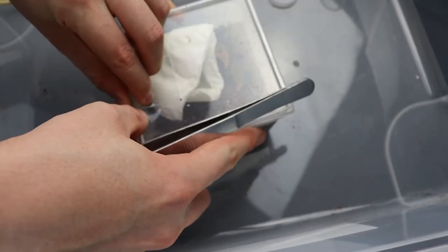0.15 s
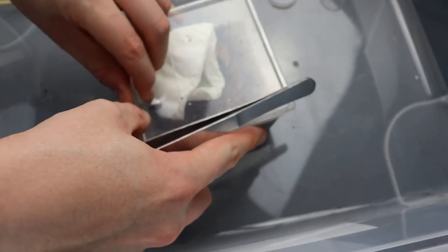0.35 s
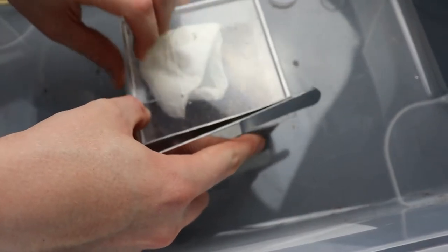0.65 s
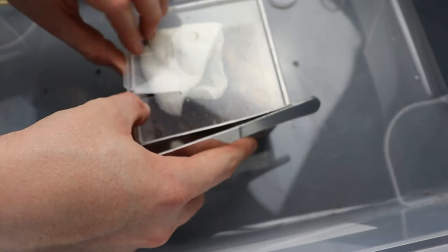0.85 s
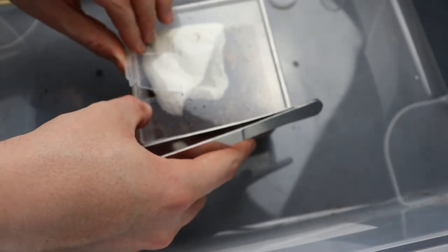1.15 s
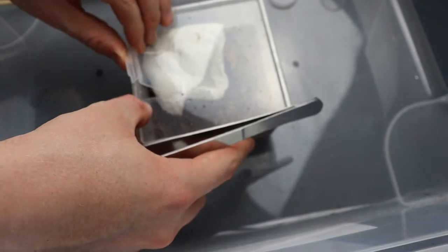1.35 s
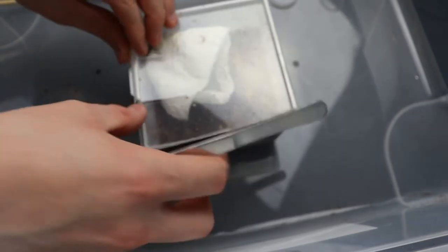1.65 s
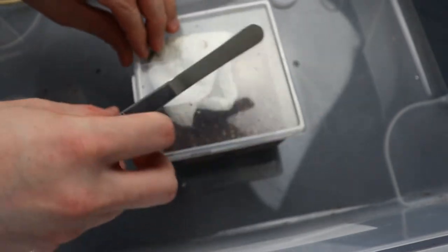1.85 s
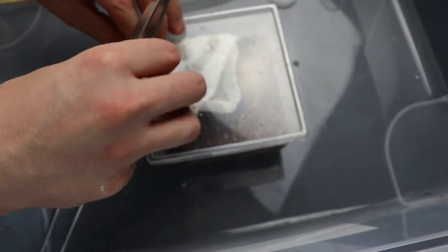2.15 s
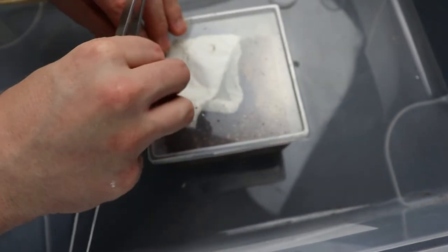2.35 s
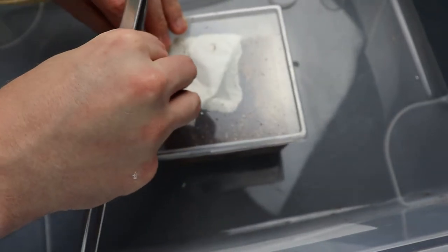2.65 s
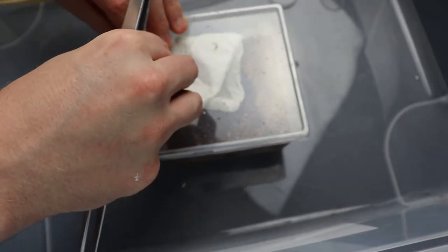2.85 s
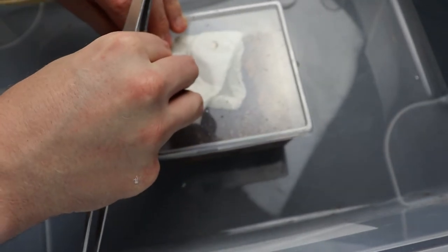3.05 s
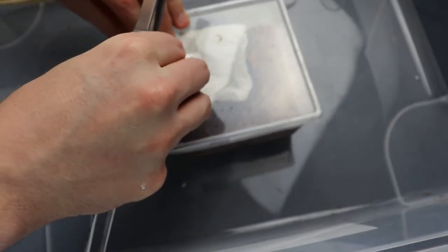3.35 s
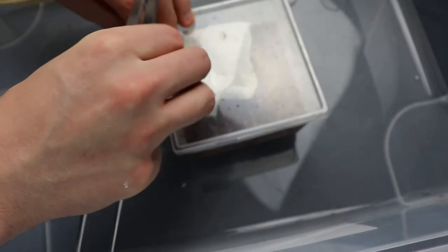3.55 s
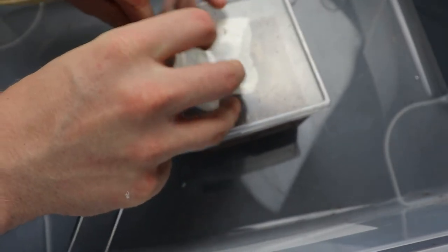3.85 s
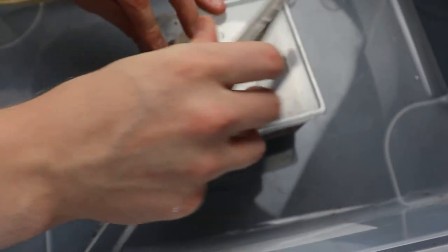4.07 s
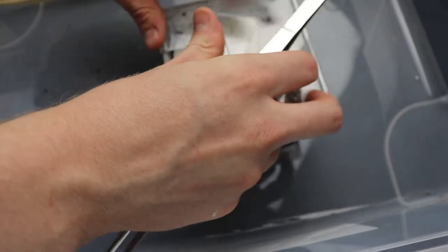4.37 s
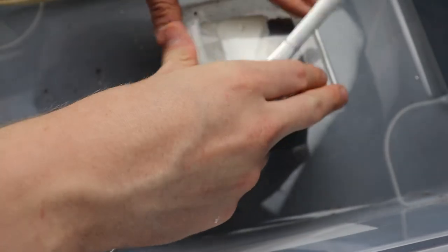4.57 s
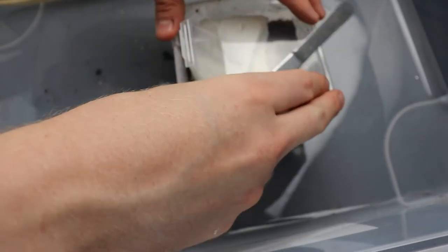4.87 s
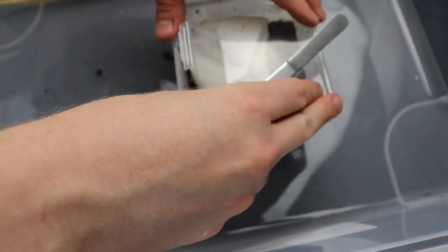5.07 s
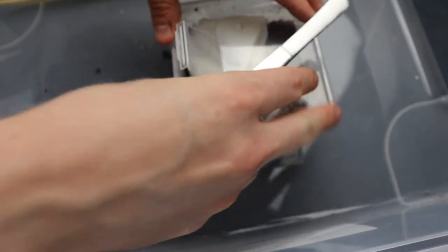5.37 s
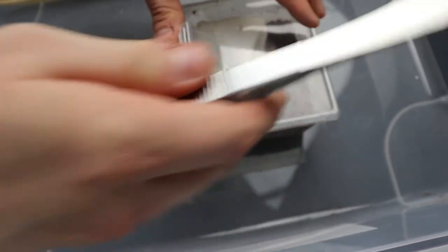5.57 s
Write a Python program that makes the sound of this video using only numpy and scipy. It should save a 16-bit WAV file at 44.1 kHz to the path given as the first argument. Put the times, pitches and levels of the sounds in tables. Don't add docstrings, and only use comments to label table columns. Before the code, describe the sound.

Close stereo microphone in a small room: fingers and steel tweezers handle a small plastic box inside a larger plastic tub. Loud hard snaps come early, with a quick lid scrape, then irregular clicks, knocks and rubbing. A crisp cluster follows in the middle, then mostly quieter shuffling with two late snaps. Appliance hum, hiss and a very faint bird lie beneath.

```python
import sys
import numpy as np
from scipy import signal
from scipy.fft import rfft, irfft, next_fast_len
from scipy.io import wavfile
from scipy.ndimage import uniform_filter1d

SR = 44100
rng = np.random.default_rng(int(sys.argv[2]) if len(sys.argv) > 2 else 0)


def master(y):
    cut = np.clip(np.atleast_2d(y).T, -1, 1)
    pcm = np.round(cut * 32767)
    wavfile.write(sys.argv[1], SR, pcm.astype(np.int16))


def decibels_to_gain(level_db):
    exponent = np.asarray(level_db, float) / 20
    return 10 ** exponent


N = 251811

# f/Hz, level/dB, t60/s
TUB_FLOOR_MODES = [(67, -9, 0.17), (106.7, -7, 0.13), (123.6, 3.5, 0.14), (145.8, 9, 0.048),
                   (171, 1.5, 0.06)]
TUB_SIDE_MODES = [(226.4, -9, 0.046), (276.3, 1, 0.077), (313, -0.5, 0.075), (346.7, 0.5, 0.061),
                  (383.4, 1.5, 0.049), (456, -2, 0.078), (542.6, 1, 0.051), (647, -1.5, 0.068),
                  (708, -1, 0.012)]
BOX_WALL_MODES = [(732, -3, 0.058), (972, 3.5, 0.06), (1116.5, 7, 0.057), (1183.4, 5.5, 0.048),
                  (1289, 10, 0.028), (1479, 8, 0.056), (1717, 10, 0.025), (1875, 8, 0.027),
                  (2000, 3, 0.0065)]
LID_CATCH_MODES = [(2145, -1, 0.0054), (2600, 1.5, 0.0085), (2662, 0, 0.012), (2937, 1, 0.018),
                   (3167, -2.7, 0.03), (3500, 0.4, 0.014), (3958, -2, 0.018), (3985, -5.1, 0.019),
                   (4504, -4, 0.0025)]
# f/Hz, level/dB
EDGE_COLOUR = [(4500, 6.5), (5400, 11.5), (6800, 9.5), (8500, 5.5), (12000, 3.5), (16000, -6.5)]

# t/s, box wall peak level/dB, weight on the tub/dB, hardness/dB; snaps add nearness to the catch/dB
SNAPS = [(0.068, -17.5, -21.5, -33, 3), (0.142, -1.5, -10.5, -15, -2), (0.329, -11, -19, -19, 0.5),
         (0.893, -5, -11, -9, 1), (1.841, -3.5, -12, -23, 0), (1.945, -13, -13.5, -8.5, 3),
         (2.334, -19, -19, -11.5, 4), (2.383, -23.5, -12.5, -16, 3), (2.491, -25.5, -14, -6.5, -2),
         (2.499, -8, -20.5, -7, -5.5), (3.036, -10, -20, -8, 0), (3.261, -10.5, -16, 2, -3),
         (3.284, -40, -14, 11, 1.5), (3.417, -27.5, -15, -15.5, 4), (3.563, -2, -20, -10.5, -10.5),
         (3.579, -10, -22, -11.5, -3), (4.671, -27, -8, -26, 6.5), (4.984, -9.5, -8, -3, -5)]
TICKS = [(0.537, -29.5, -7.5, -12.5), (0.819, -27, -13.5, -22), (0.836, -30, -8.5, -33),
         (1.502, -46, -4, -8), (1.542, -38, -16, -7.5), (1.769, -34, -11.5, -17.5),
         (2.213, -30, -16, -16.5), (2.469, -30, -17, -27), (3.755, -30.5, -7, -9), (3.806, -52.5, -4, 2.5),
         (4.002, -43.5, -13, -35), (4.066, -40.5, -15, -28), (4.127, -43.5, -5.5, -28), (5.393, -55, 0, -7),
         (5.481, -35, -7.5, -8.5), (5.504, -47, -6, -2), (5.583, -45, -8, -18)]
THUDS = [(0.043, -24, 4, -36), (0.562, -29, -17, -27.5), (0.706, -6.5, -14, -15.5), (0.709, -23, -8, -7.5),
         (1.565, -32.5, -4, -16.5), (1.844, -17, -1.5, -23), (1.856, -16.5, -6.5, -47),
         (2.354, -10.5, -7.5, -21), (3.532, -38, 2, -6), (3.63, -35, -4, -19), (3.84, -36.5, -6.5, -22.5),
         (3.892, -37.5, 1.5, -18.5), (4.251, -41.5, -0.5, -25), (4.279, -53, 11.5, -16),
         (4.309, -31.5, -5.5, -34), (4.389, -42, -6.5, -31), (4.575, -25, -2, -35), (4.735, -54, 13, -24),
         (4.838, -41.5, -2.5, -29), (5.312, -27, -4.5, -26), (5.536, -29, -7, -45), (5.607, -31.5, -7, -53),
         (5.685, -30.5, -7.5, -32)]
SHUFFLES = [(0.444, -47.5, -2, -7), (0.641, -37, -8, -19), (1.128, -39.5, -8.5, -29),
            (1.149, -41, -1.5, -19), (3.398, -46.5, -24, -8.5), (3.49, -58, -5, -4), (4.228, -56, -2, -2.5),
            (4.327, -50.5, 6, -7), (4.503, -59.5, 10, -6), (4.548, -45, 1.5, -17),
            (5.423, -44.5, 1.5, -7.5)]
RUSTLES = [(1.073, -47, -5, -17), (1.244, -57, -7, -5.5), (1.643, -56.5, -3, -5), (1.708, -48.5, -8, -12.5),
           (2.165, -54.5, 7, -18), (2.638, -44.5, -7.5, -24), (3.928, -66, -6, -11),
           (4.164, -47, -11, -8.5), (4.613, -47, -4, -13.5)]
# length/ms, first blow, fading, swelling
CHATTER = [
    (2.184, 3.2, 4.4, 0.0013),
    (6.88, 2.06, 2.04, 0.072),
    (20.09, 0.075, 0.89, 0),
    (54.9, .1, 2.15, 1.06),
]
# tub floor re sides/dB, change/(dB per dB strength),
# lid catch/dB, change/(dB per dB hardness)
REACH = [
    (-23.5, -0.56, -2.5, 0.66),
    (-3.5, 0.06, -4, 0.5),
    (-3.5, 0.2, -1, 0.9),
    (1, 0.1, 2.5, 1.4),
]
SIDE_TILT_DB_PER_OCT = [5.5, 2, 1.5, .5]

# t/s, level/dB, panel f/Hz
SCRAPE = [
    (.662, -69, 2600),
    (0.67, -41.5, 2520),
    (0.686, -38, 2690),
    (0.693, -29.5, 2460),
    (0.708, -29.5, 2860),
]
# t/s, level/dB, start f/Hz, end f/Hz, length/s
CHIRPS = [
    (1.322, -59.5, 5030, 4900, 0.086),
    (1.406, -55.5, 4230, 4160, 0.044),
    (2.088, -61.5, 5250, 4940, .06),
    (2.168, -54, 4200, 4170, 0.044),
]

# t/s, pressure level/dB
PRESSURE = [(0.0, -39), (0.16, -68.5), (0.33, -62), (0.46, -59.5), (0.79, -57.5), (1.19, -62),
            (1.49, -62.5), (1.78, -55.5), (2.11, -64.5), (2.51, -60.5), (2.8, -65), (3.05, -65),
            (3.53, -57), (4.9, -60), (5.15, -66), (5.36, -65), (5.5, -58.5), (5.71, -56)]
RESTING_HAND_DB = -59.5
# level at rest/dB, change/(dB per dB pressure)
WALL_RUB = (-64, 1.27)
TUB_RUB = (-56, 0.76)
SKIN_RUB = (-72, 0.87)

# f/Hz, level/(dB per Hz)
BACKGROUND = [(20, -23), (72, -8), (120, 5.5), (270, -8), (503, -10), (863, -19), (1600, -15.5),
              (16000, -30.5)]
BACKGROUND_DB = -55
# f/Hz, likeness
BACKGROUND_LIKENESS = [(60, 0.5), (240, 0.97), (950, -1.1), (3770, -2.9), (15000, 0.9)]
# f/Hz, likeness
TUB_LIKENESS = [(100, 1), (1000, 0.97), (4000, 0.57), (15000, 0)]
# f/Hz, t60/s
ROOM_T60 = [(100, 0.13), (300, 0.36), (800, 0.23), (2000, 0.16), (5000, 0.15), (13000, 0.12)]
# f/Hz, left minus right level/dB
BALANCE_DB = [(60, -4), (240, -2), (950, -4), (3770, -5), (15000, -6.5)]


def evened(x):
    return x / np.sqrt(np.mean(x ** 2) + 1e-20)


def read(points, hz):
    f, value = np.transpose(points)
    return np.interp(np.log(hz + 1), np.log(f + 1), value)


def add(mix, s, sound):
    part = mix[..., round(s * SR):][..., :sound.shape[-1]]
    part += sound[..., :part.shape[-1]]


def paired(size, likeness, frame):
    hz = np.fft.rfftfreq(frame, 1 / SR)
    a, b, c, d = rng.standard_normal((size, len(hz), 4)).T
    same = np.clip(read(likeness, hz), 0, 1)[:, None]
    left, other = a + 1j * b, c + 1j * d
    return hz, np.array([left, same * left + np.sqrt(1 - same ** 2) * other])


def hum_and_hiss():
    hz, z = paired(N // 256 + 5, BACKGROUND_LIKENESS, frame=1024)
    z = z * decibels_to_gain(read(BACKGROUND, hz))[:, None]
    noise = signal.istft(z, nperseg=1024, noverlap=768)[1][:, :N]
    return decibels_to_gain(BACKGROUND_DB) * evened(noise) * decibels_to_gain([[-1.5], [1.5]])


def ring(hz, db, t60, size, rise_s=0.000069):
    t = np.arange(size) / SR
    modes = decibels_to_gain(-60 * t / t60[:, None]) * np.sin(2 * np.pi * hz[:, None] * t)
    return decibels_to_gain(db) @ modes * (1 - np.exp(-t / rise_s))


def rub():
    press_db = np.interp(np.arange(N) / SR, *np.transpose(PRESSURE)) - RESTING_HAND_DB
    wall_db, tub_db, hiss_db = (db + follows * press_db for db, follows in (WALL_RUB, TUB_RUB, SKIN_RUB))
    clumps = decibels_to_gain(4.0 * evened(uniform_filter1d(rng.standard_normal(N), 900)))
    strength = decibels_to_gain(3.2 * np.minimum(rng.exponential(1, (3, N)), 5))
    slips_per_s = 1500 * clumps
    slips = strength * (rng.random((3, N)) < slips_per_s / SR)
    slips *= rng.standard_normal((3, N))
    wall = signal.lfilter(*signal.butter(1, [450, 2200], "band", fs=SR), slips[0])
    hz, db, t60 = np.transpose(TUB_FLOOR_MODES + TUB_SIDE_MODES)
    tub = signal.oaconvolve(slips[1], ring(hz, db, .5 * t60, size=5000))[:N]
    breath = slips[2] + 1.5 * rng.standard_normal(N)
    hiss = signal.lfilter(*signal.butter(2, 4500, "high", fs=SR), breath)
    return decibels_to_gain(wall_db) * evened(wall) + decibels_to_gain(tub_db) * evened(tub) + decibels_to_gain(hiss_db) * evened(hiss)


def shares(reach, db, weight_db, hard_db, near_db=0):
    floor_db, per_strength, catch_db, per_hardness = reach
    tub_db = weight_db + floor_db + per_strength * db
    return tub_db, weight_db, catch_db + per_hardness * hard_db + near_db, hard_db


def spread(hz, level_db, size=2048):
    f = np.fft.rfftfreq(size, 1 / SR) + 1
    gain = decibels_to_gain(np.interp(f, hz, level_db))
    gain = gain / (1 + (.9 * hz[0] / f) ** 6) / (1 + (f / hz[-1] / 1.1) ** 6)
    cepstrum = irfft(np.log(gain + 1e-4 * gain.max()))[:size // 2]
    causal = np.r_[1, np.full(size // 2 - 1, 2)]
    return irfft(np.exp(rfft(cepstrum * causal, size)))


def chatter(contact, gaps, blows):
    length_ms, first, fading, swelling = contact
    when = np.r_[0, gaps]
    force = np.r_[first, 2 * blows - 1] * np.exp(-fading * when) * (when + 0.018) ** swelling
    return np.bincount((when * length_ms * SR / 1000).astype(int), force)


def hit(s, db, tub_db, sides_db, catch_db, edge_db, contact, tilt_db, luck):
    gaps, blows, detune, uneven, facing = luck.reshape(5, -1)
    push = chatter(contact, gaps, blows)
    swells = contact[3] > 0
    edge_hz = np.linspace(4550, 15600, len(gaps))
    edge_t60 = .003 + .006 * detune ** 3
    side_hz, side_db, side_t60 = np.transpose(TUB_SIDE_MODES)
    side_db = side_db + tilt_db * np.log2(side_hz / side_hz[0])
    # f/Hz, level/dB, t60/s, share/dB, rise/s
    bodies = [(*np.transpose(TUB_FLOOR_MODES), tub_db + 2.5, .018),
              (side_hz, side_db, side_t60, sides_db + 3.5, .001),
              (*np.transpose(BOX_WALL_MODES), -.7, .00015),
              (*np.transpose(LID_CATCH_MODES), catch_db + 14.5, .0001),
              (edge_hz, read(EDGE_COLOUR, edge_hz), edge_t60, edge_db + 16, .00008)]
    out = np.zeros((3, 11000))
    for hz, level_db, t60, share_db, rise_s in bodies:
        size, count = int(min(t60.max(), .15) * SR), len(hz)
        no_bass = signal.butter(2, 0.51 * hz[0], "high", fs=SR)
        even = signal.fftconvolve(spread(hz, level_db), push if swells else [1.])
        hz = hz * (1 + 0.089 * (detune[:count] - .5))
        drive = abs(signal.freqz(push, worN=hz, fs=SR)[1]) + .05 * np.linalg.norm(push)
        caught_db = .7 * 20 * np.log10(drive)
        facing_db = 6 * (facing[:count] - .5) * np.minimum(hz / 1500, 1)
        mode_db = level_db - caught_db + 11 * uneven[:count] + np.outer([-1, 1], facing_db)
        near = ring(hz, mode_db, t60, size, rise_s)
        near = signal.lfilter(*no_bass, signal.fftconvolve(near, push[None], axes=1))
        near *= decibels_to_gain(db + share_db) / abs(near).max()
        out[:2, :near.shape[1]] += near
        out[2, :len(even)] += even * np.linalg.norm(near[0]) / np.linalg.norm(even)
    return s + .0008, out


def echoes(x, likeness, t60_of, start, size, late_db=-90, slower=2.4):
    hz, z = paired(size, likeness, frame=256)
    t = np.arange(size) * 64 / SR
    t60 = t60_of(hz)[:, None]
    decay = decibels_to_gain(-60 * t / t60) + decibels_to_gain(late_db - 60 * t / slower / t60)
    tail = signal.istft(z * decay, nperseg=256, noverlap=192)[1]
    tail = np.pad(tail / np.linalg.norm(tail[0]), ((0, 0), (start, 0)))
    return signal.oaconvolve(x[None], tail, axes=1)[:, :N]


def tub_scatter(x):
    return decibels_to_gain(-2.5) * echoes(x, TUB_LIKENESS, lambda hz: 0.018 + 0 * hz, start=40, size=60)


def room_answer(x):
    likeness = [(100, 1.0), (400, 0.94), (1000, 0.43), (5000, 0.48)]  # f/Hz, likeness
    return decibels_to_gain(-11.0) * echoes(x, likeness, lambda hz: read(ROOM_T60, hz), start=250, size=350, late_db=-21)


def scrape():
    s, db, hz = np.transpose(SCRAPE)
    t = np.arange(s[0], s[-1], 1 / SR)
    noise = rng.standard_normal(len(t))
    turn = np.exp(2j * np.pi * np.cumsum(np.interp(t, s, hz)) / SR)
    r = np.exp(-np.pi * 900 / SR)
    panel = (turn * signal.lfilter([1 - r], [1, -r], noise / turn)).real
    fizz = 0.22 * noise
    return s[0], decibels_to_gain(np.interp(t, s, db)) * (evened(panel) + fizz) * signal.windows.tukey(len(t), .15)


def chirp(s, db, start_hz, end_hz, length_s):
    hz = np.linspace(start_hz, end_hz, round(length_s * SR))
    blur_hz = 30 + 0.26 * (start_hz - 4200)
    blur = evened(uniform_filter1d(rng.standard_normal(len(hz)), 120)) * blur_hz
    return s, decibels_to_gain(db) * np.sin(2 * np.pi * np.cumsum(hz + blur) / SR) * np.hanning(len(hz))


def ports(x, late_samples=2.35):
    size = next_fast_len(N)
    hz = np.fft.rfftfreq(size, 1 / SR)
    half = decibels_to_gain(read(BALANCE_DB, hz) / 2)
    delay = np.exp(-2j * np.pi * hz * late_samples / SR)
    low_cut = (1 + 35 / (1j * hz + 1e-9)) ** 2
    high_cut = 1 + (hz / 15900) ** 40
    gain = np.array([half, delay / half]) / low_cut / high_cut
    return irfft(rfft(x, size) * gain, size)[:, :N]


def scene():
    box, bird = np.tile(rub(), (3, 1)), np.zeros(N)
    kinds = (sorted(SNAPS + TICKS), THUDS, SHUFFLES, RUSTLES)
    for rows, contact, reach, tilt_db in zip(kinds, CHATTER, REACH, SIDE_TILT_DB_PER_OCT):
        for (s, db, *touch), luck in zip(rows, rng.random((len(rows), 200))):
            add(box, *hit(s, db, *shares(reach, db, *touch), contact, tilt_db, luck))
    s, sound = scrape()
    add(box, s, sound[None])
    for row in CHIRPS:
        add(bird, *chirp(*row))
    near = box[:2] + tub_scatter(box[2]) + room_answer(box[2])
    return ports(near) + bird + hum_and_hiss()


def roll_off(x):
    return signal.sosfilt(signal.butter(12, 16440, fs=SR, output="sos"), x)


def record(dry):
    mix = np.clip(dry, -1, 1)
    return roll_off(mix)


dry = scene()
out = record(dry)
master(out)
```